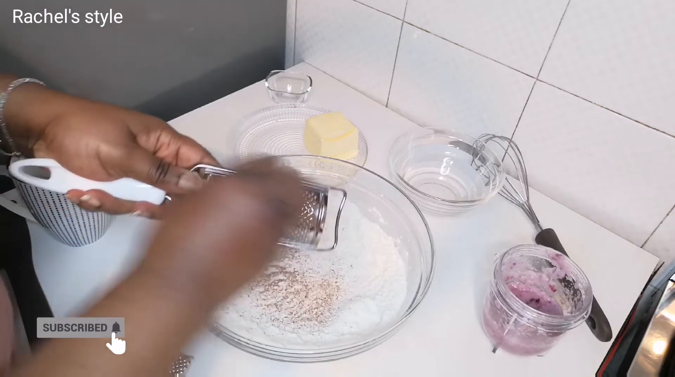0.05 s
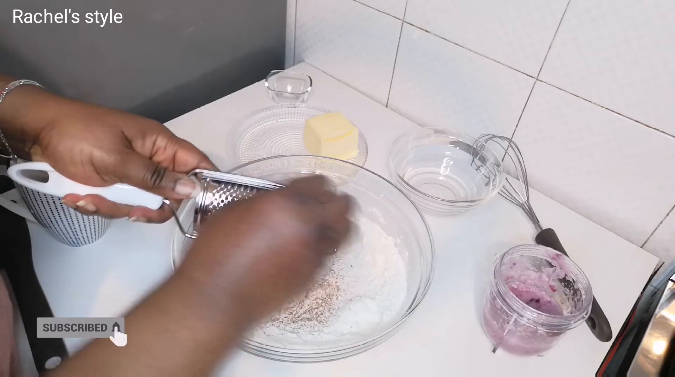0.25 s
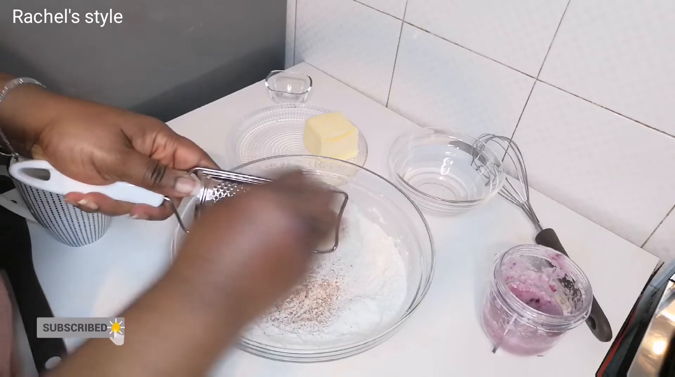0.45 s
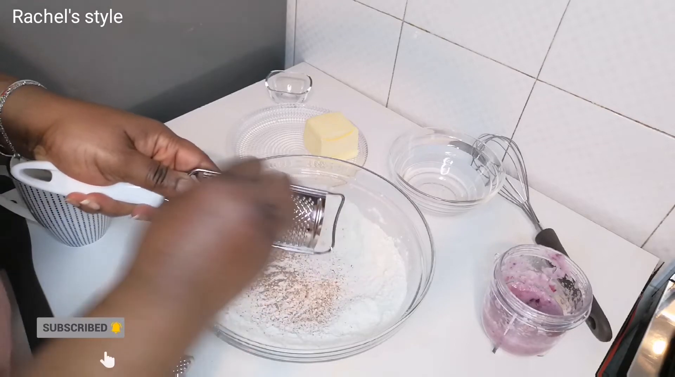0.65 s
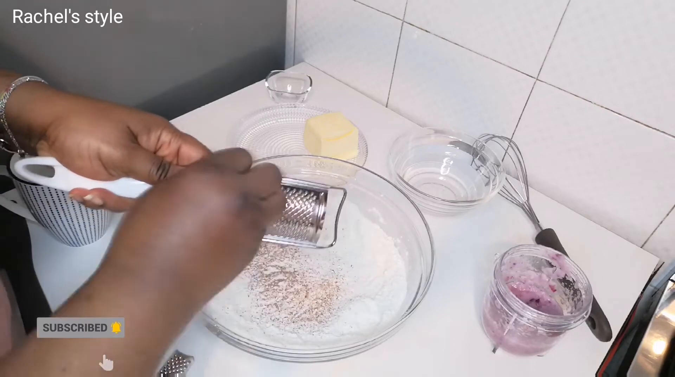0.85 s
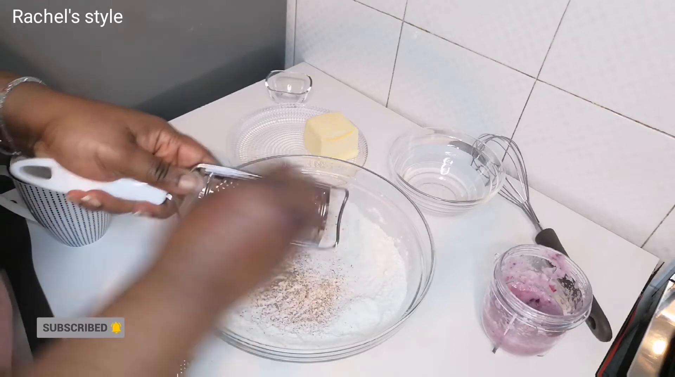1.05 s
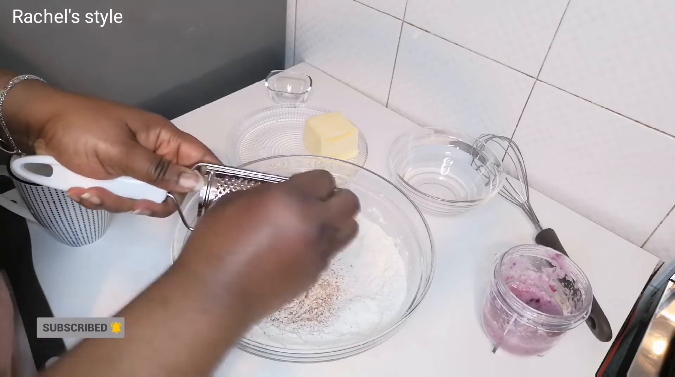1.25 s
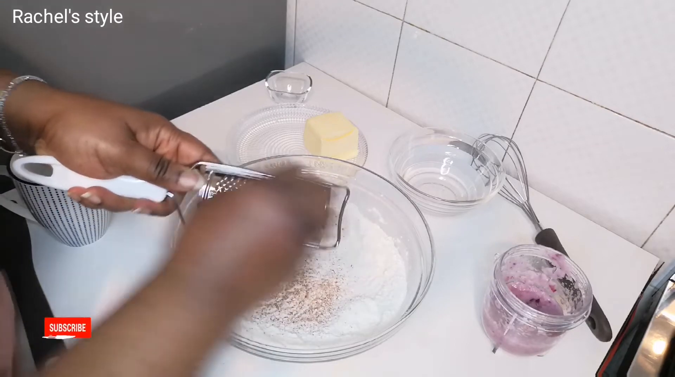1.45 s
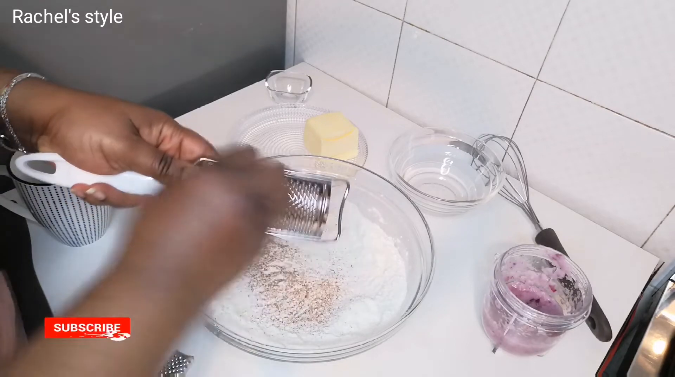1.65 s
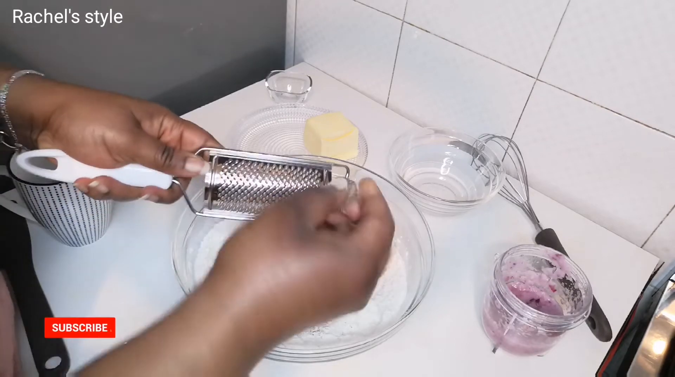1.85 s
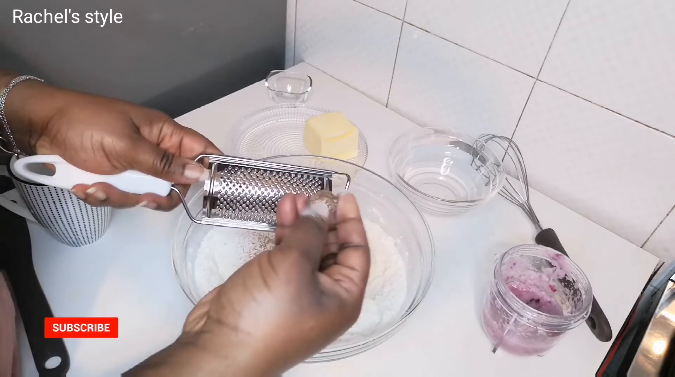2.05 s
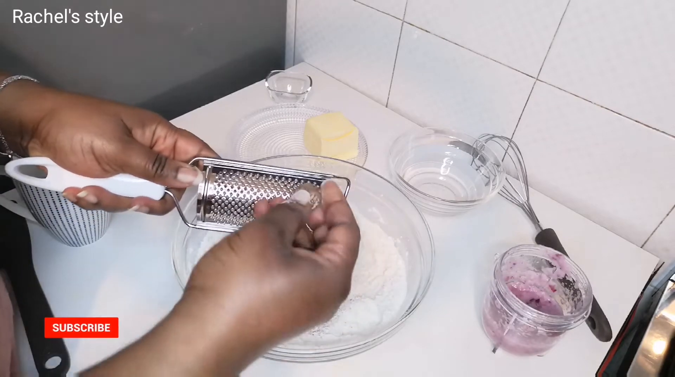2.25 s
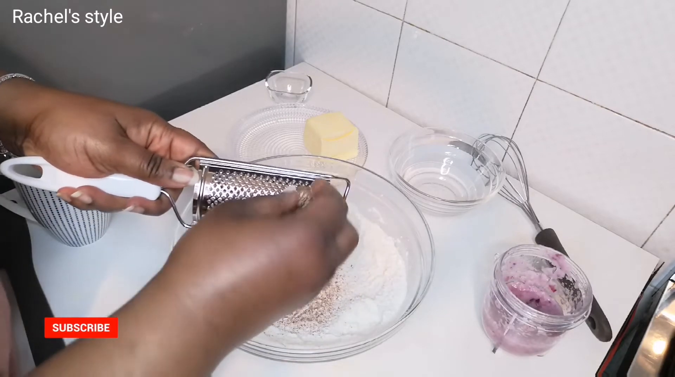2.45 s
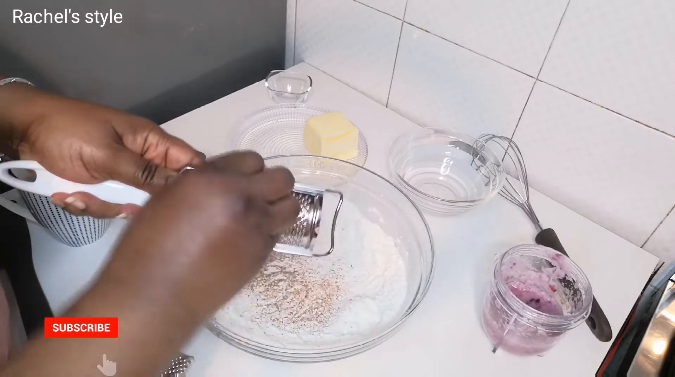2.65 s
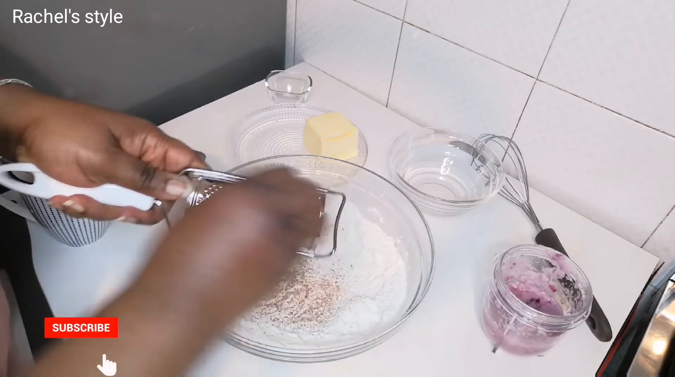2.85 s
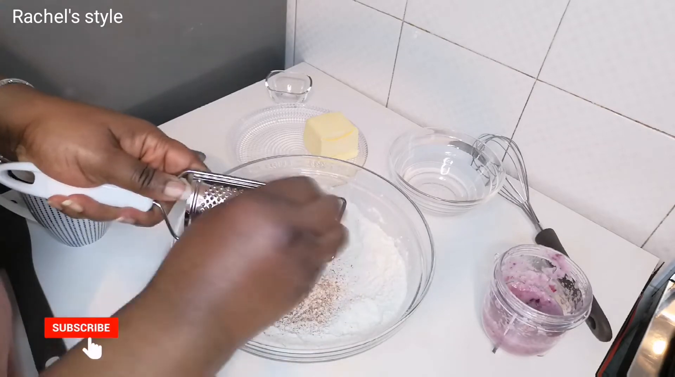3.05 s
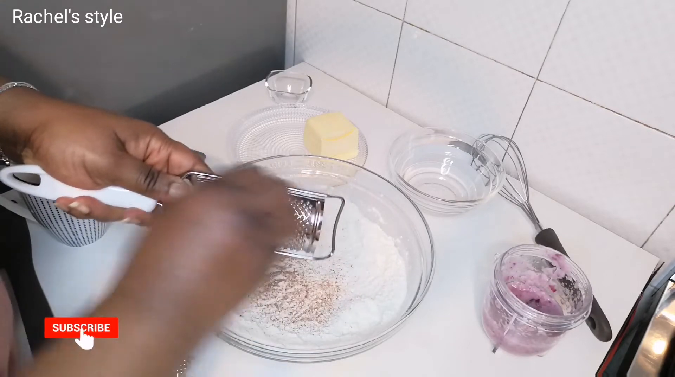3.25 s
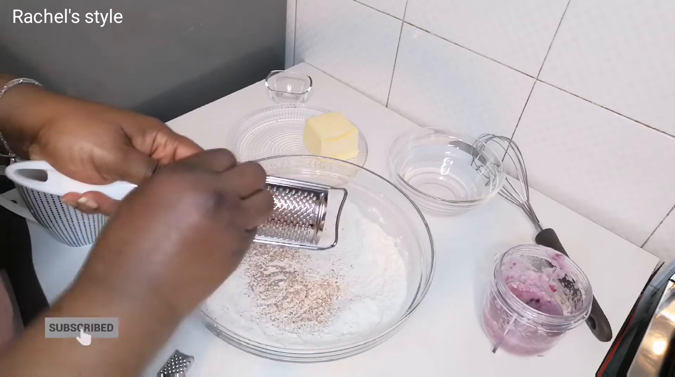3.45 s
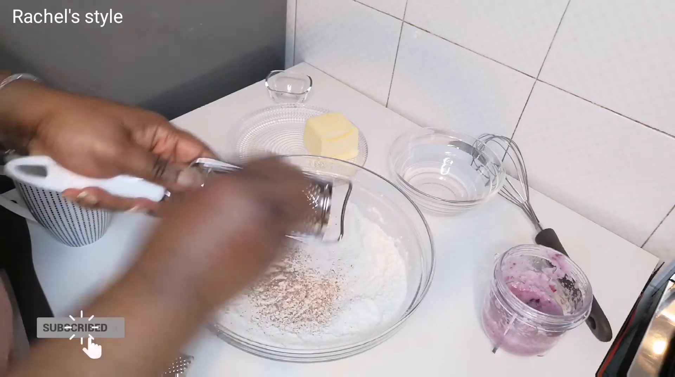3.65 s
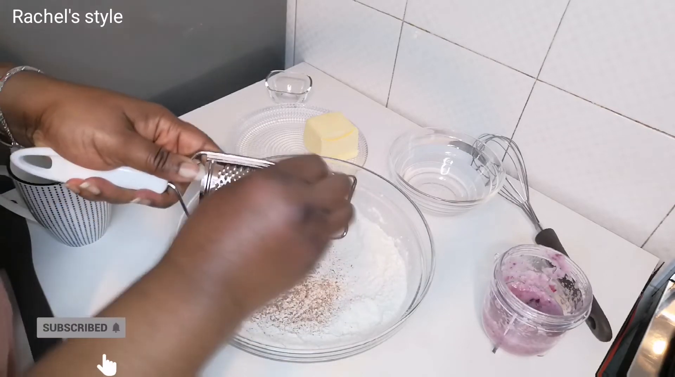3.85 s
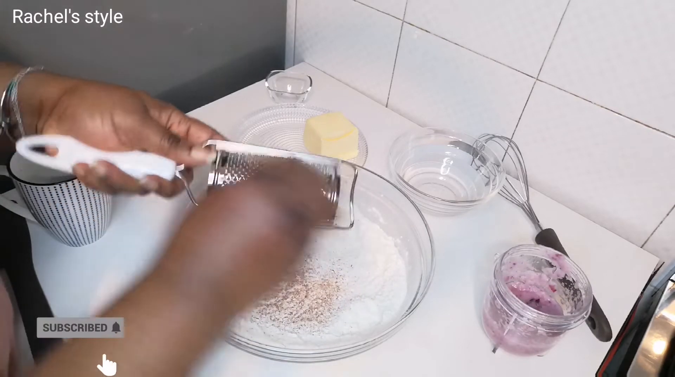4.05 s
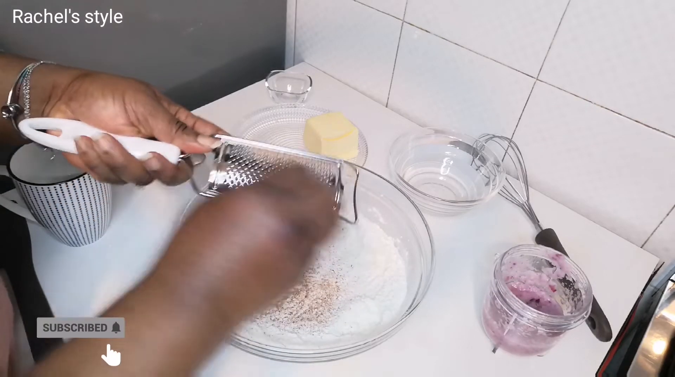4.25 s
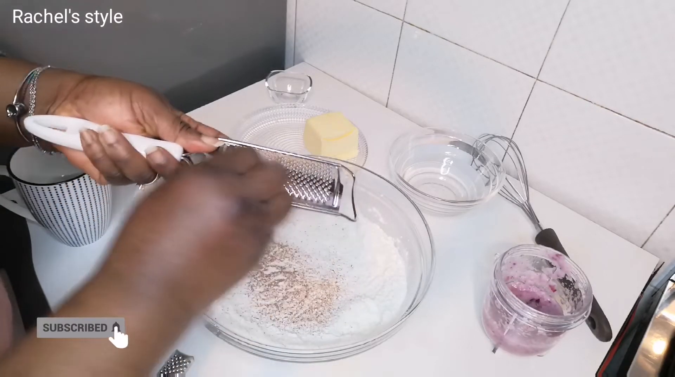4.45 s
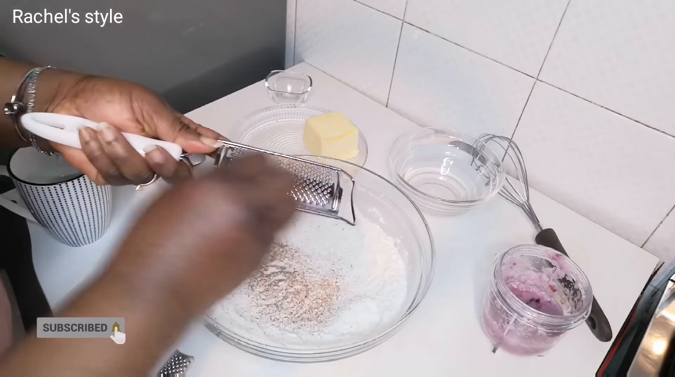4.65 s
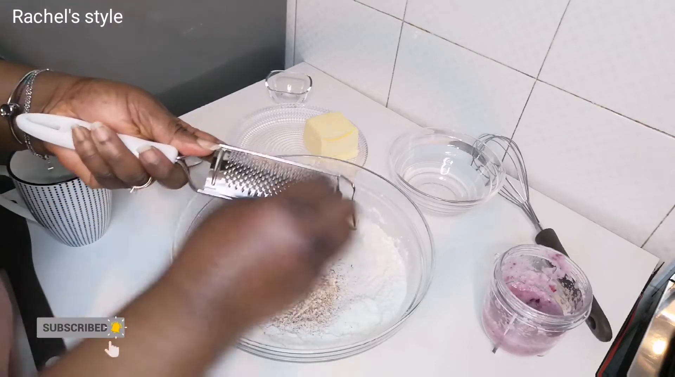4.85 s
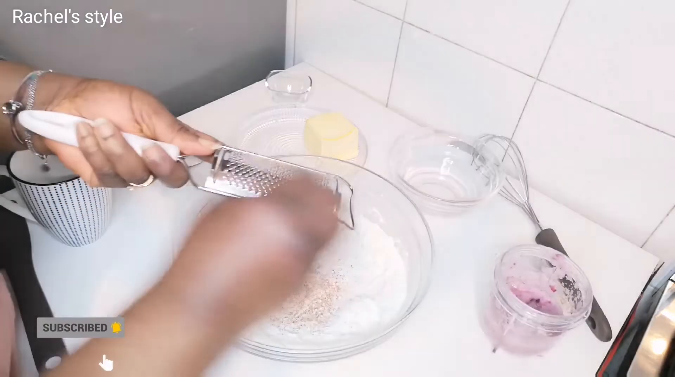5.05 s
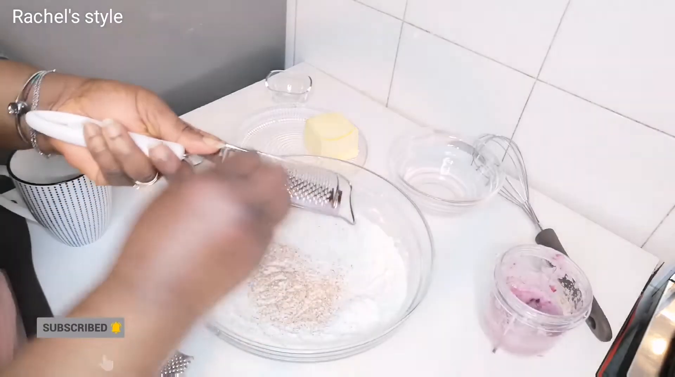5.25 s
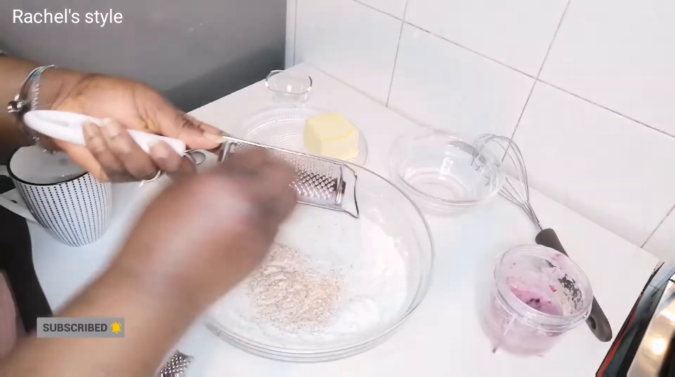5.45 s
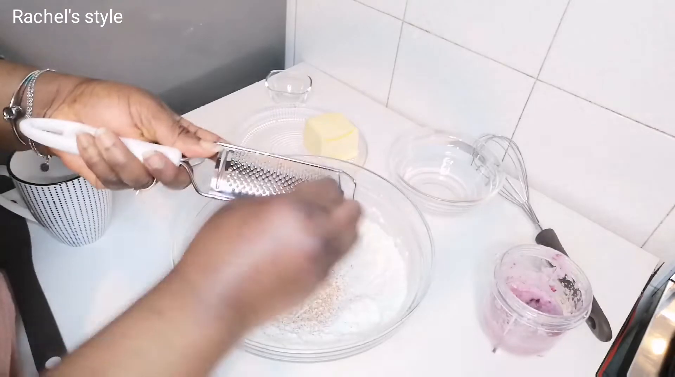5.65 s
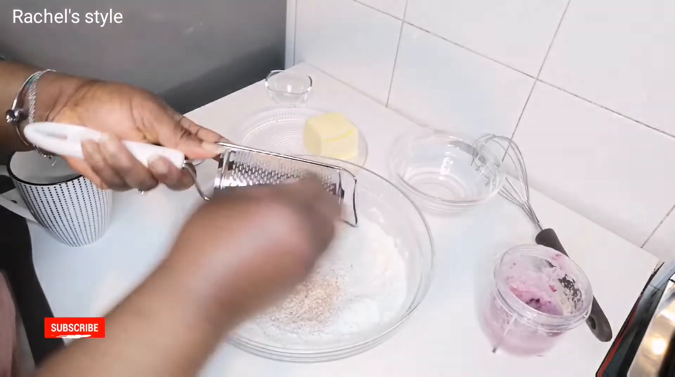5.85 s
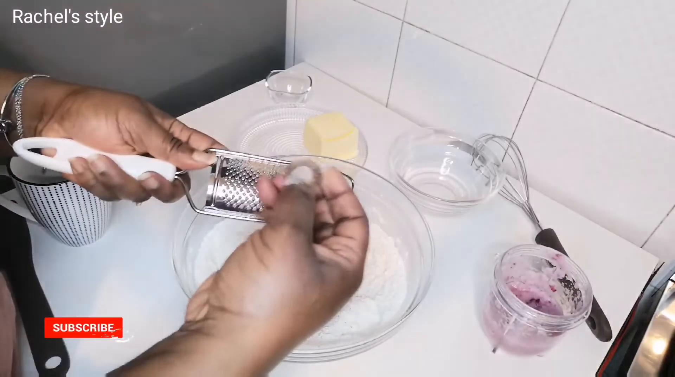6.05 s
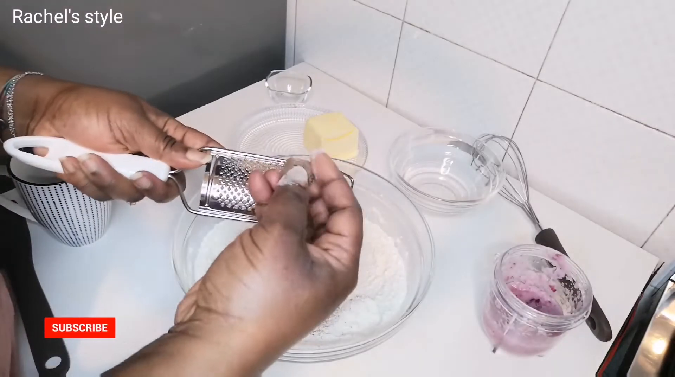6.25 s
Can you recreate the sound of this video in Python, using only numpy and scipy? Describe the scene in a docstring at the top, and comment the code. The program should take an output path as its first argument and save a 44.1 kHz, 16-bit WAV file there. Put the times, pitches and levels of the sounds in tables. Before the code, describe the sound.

Close up in a home kitchen with a slight echo, a hard spice scrapes quickly and evenly across a small metal grater. The strokes are bright and gritty, now and then snagging on a tooth or knocking softly. They break off for under a second, then carry on in a longer run whose metallic tone shifts partway through. A steady low appliance hum lies underneath and remains when the strokes stop.

```python
"""Over the hum of a kitchen appliance, a nutmeg is rubbed to and fro on a small hand-held steel grater,
eight strokes a second. The teeth chip the nut in dense tiny snaps that ring the sheet, with the odd
hard catch and dull thud. Near 1.9 s the cook pauses, and a slow gain control brings the hum forward.
Near 2.7 s the grating resumes in a new grip; at 4.1 s the grater tilts and its ring changes colour.
The strokes stop near 6 s and leave the hum."""
import sys
import numpy as np
from scipy import signal
from scipy.fft import rfft, irfft, next_fast_len
from scipy.io import wavfile
from scipy.ndimage import uniform_filter1d, map_coordinates

SR = 44100
rng = np.random.default_rng(int(sys.argv[2]) if len(sys.argv) > 2 else 0)


def wav_record(signal):
    """Record a signal, one row per channel, as 16-bit PCM in the file named by sys.argv[1]."""
    frames = np.transpose(np.atleast_2d(signal))
    bounded = np.clip(frames, -1, 1)
    # unit amplitude maps onto the largest positive 16-bit level
    quanta = np.round(bounded * 32767).astype(np.int16)
    wavfile.write(sys.argv[1], SR, quanta)


N = 277830

# the nut is driven along the teeth, and drawn back: (first bite [s], length [s], level [dB])
PUSHES = [(-0.03, 0.068, -29), (0.21, 0.072, -27), (0.459, 0.073, -28.5), (0.711, 0.061, -28.5),
          (0.956, 0.069, -28.5), (1.203, 0.061, -28.5), (1.455, 0.074, -32.5), (1.704, 0.063, -29.5),
          (2.771, 0.075, -35.5), (3.01, 0.069, -30.5), (3.263, 0.078, -32), (3.518, 0.075, -32.7),
          (3.779, 0.07, -32.5), (4.026, 0.079, -34.5), (4.282, 0.067, -29.5), (4.537, 0.079, -32),
          (4.805, 0.071, -35), (5.057, 0.083, -32.5), (5.334, 0.058, -34), (5.572, 0.071, -32),
          (5.827, 0.07, -33)]
PULLS = [(0.083, 0.085, -31), (0.337, 0.069, -28), (0.583, 0.083, -32), (0.833, 0.077, -32),
         (1.072, 0.088, -31.5), (1.322, 0.081, -32), (1.579, 0.085, -34), (1.822, 0.064, -33),
         (2.888, 0.078, -35), (3.144, 0.082, -35.4), (3.395, 0.082, -36), (3.66, 0.077, -34.5),
         (3.898, 0.085, -36), (4.161, 0.086, -40), (4.408, 0.084, -33.5), (4.676, 0.084, -36.5),
         (4.928, 0.095, -35.5), (5.195, 0.095, -37.5), (5.458, 0.076, -36), (5.695, 0.086, -35)]
# the hand moves to the second grip, then to the tilted one: (time [s])
GRIP_CHANGES = [2.3, 4.14]


def amp(db):
    """Decibels to gain."""
    return 10 ** (np.asarray(db) / 20)


def unit(x):
    """Scale to rms 1."""
    return x / np.sqrt(np.mean(x ** 2) + 1e-20)


def along(points, hz):
    """Read a curve of (frequency [Hz], value) points on a log axis."""
    freqs, values = np.transpose(points)
    return np.interp(np.log(hz + 1), np.log(freqs), values)


def wobble(rate):
    """A smooth random curve, rate knots a second."""
    knots = rng.standard_normal(int(N * rate / SR) + 4)
    return map_coordinates(knots, [np.arange(N) * rate / SR])


def filtered(x, response):
    """Equalise x with a gain given as a function of frequency."""
    size = next_fast_len(N + SR // 2)
    return irfft(rfft(x, size) * response(np.fft.rfftfreq(size, 1 / SR)), size)[:N]


def appliance(mains_hz=100.04, mains_db=-41, air_db=-54, waver_db=0.67):
    """The bed: a steady mains hum with faint motor tones over a soft rush of air."""
    # motor tones: (frequency [Hz], level [dB])
    motor_tones = [(49.5, -83), (200.08, -69.5), (299, -64.5), (314, -66), (393, -74), (495, -71),
                   (590, -75), (680, -79), (834, -78), (1925, -81), (1990, -82)]
    # spectrum of the air noise: (frequency [Hz], relative level [dB])
    air_spectrum = [(25, -3.5), (55, 0.5), (140, 1.5), (180, -6.5), (285, -1.5), (470, -6), (700, -16),
                    (1400, -24), (3300, -29), (4000, -39.5), (6800, -29), (8800, -42.5), (13500, -39.5),
                    (14900, -31.5)]
    t = np.arange(N) / SR
    tone = lambda hz, db: amp(db) * np.sqrt(2) * np.sin(2 * np.pi * (hz * t + rng.random()))
    mains = tone(mains_hz, mains_db) * amp(waver_db * wobble(6.9))
    motor = sum(tone(hz, db) * amp(3.34 * wobble(16)) for hz, db in motor_tones)
    air = unit(filtered(rng.standard_normal(N), lambda hz: amp(along(air_spectrum, hz))))
    return mains + motor + amp(air_db) * air


def kitchen(x, predelay_s=.003, blocks=20):
    """The tiled room's tail, drawn afresh for each block as the moving hands change the paths."""
    # reverb decay: (frequency [Hz], t60 [s])
    decay_times = [(200, 0.12), (1300, 0.51), (3500, 0.46), (9000, 0.41), (15000, 0.3)]
    wet = np.zeros(N + SR)
    for block in np.array_split(np.arange(N), blocks):
        hz, t, noise = signal.stft(rng.standard_normal(SR // 2), SR, nperseg=256)
        decay = amp(-60 * t / along(decay_times, hz)[:, None])
        tail = signal.istft(noise * decay, SR, nperseg=256)[1]
        echo = signal.fftconvolve(x[block], tail / np.linalg.norm(tail))
        wet[block[0] + round(predelay_s * SR):][:len(echo)] += echo
    return wet[:N]


def thuds(t60=0.2, attack_s=0.0016):
    """Now and then the grater gives in the hand and thuds dully, softly started and soon damped."""
    # (time [s], level [dB], pitch [Hz])
    dull_thuds = [(0.341, -40.5, 351), (1.332, -41, 402), (1.385, -40.5, 339), (2.772, -38.5, 333),
                  (2.926, -40, 347), (4.05, -42.5, 352)]
    out, t = np.zeros(N + SR), np.arange(SR // 3) / SR
    for s, db, hz in dull_thuds:
        phase = 2 * np.pi * hz * t + .8 * wobble(140)[:len(t)]
        envelope = amp(db - 60 * t / t60) * (1 - np.exp(-t / attack_s))
        out[round(s * SR):][:len(t)] += envelope * np.sin(phase)
    return out[:N]


def snaps(rate, scatter_db):
    """Chips break off as random clicks of uneven size, rate a second, of mean power 1."""
    chance = np.clip(rate / SR, 1e-4, 1)
    sizes = unit(amp(scatter_db * np.clip(rng.standard_normal(N), -2, 2)))
    signs = rng.choice([-1, 1], N)
    return (rng.random(N) < chance) * sizes * signs / np.sqrt(chance)


def bands(hz, body_hz=2200, zip_hz=5550, zip_width_hz=750, fizz_hz=9500):
    """Weights 0-1 of a scrape's low body, narrow middle zip and top fizz."""
    body = 1 / (1 + (hz / body_hz) ** 4)
    zip_band = np.exp(-((hz - zip_hz) / zip_width_hz) ** 2)
    fizz = 1 - 1 / (1 + (hz / fizz_hz) ** 8)
    return body, zip_band, fizz


def toned(force, band_db, patchy_db, size=256):
    """Colour the force by band; the travelling contact point drives shifting patches of the spectrum."""
    framing = dict(nperseg=size, noverlap=size * 3 // 4)
    hz, s, spectrum = signal.stft(force, SR, **framing)
    frames = np.minimum(np.round(s * SR).astype(int), N - 1)
    colour = sum(np.outer(weight, db[frames]) for weight, db in zip(bands(hz), band_db))
    patches = uniform_filter1d(rng.standard_normal(spectrum.shape), size=3, axis=0)
    patches = uniform_filter1d(patches, size=14, axis=1)
    return signal.istft(spectrum * amp(colour + patchy_db * unit(patches)), SR, **framing)[1][:N]


def catches(t60=0.056, bite_db=1, bite_scatter_db=0.5, bite_knock_db=-5.0):
    """A tooth digs in with a burst of snaps: lightly as each stroke begins, now and then hard."""
    # the nut lands or snags on a tooth: (time [s], level [dB], knock in the body band [dB])
    snags = [(0.338, -27, 12), (1.072, -24.5, 2), (1.323, -26, 12.5), (2.727, -37, -35),
             (2.837, -27.5, -10), (4.161, -26.5, 2), (4.181, -28, 6.5), (4.223, -24.5, -2),
             (5.956, -32.5, 0)]
    t = np.arange(N) / SR
    level, knock = np.zeros(N), np.full(N, bite_knock_db)
    burst = lambda s, db: amp(db - 60 * np.abs(t - s) / t60) * (t >= s)
    for s, _, db in [*PUSHES, *PULLS]:
        level += burst(s, db + bite_db + bite_scatter_db * rng.standard_normal())
    for s, db, knock_db in snags:
        level = np.maximum(level, burst(s, db))
        knock[(t > s - .01) & (t < s + t60)] = knock_db
    return toned(level * snaps(rate=8000, scatter_db=1.5), [knock], patchy_db=3)


def strokes():
    """Every stroke with the swing of its direction and the tone of its grip."""
    # the hand's swing: (run-up before the bite [s], fastest point [share of length], run-out [s])
    push_swing = (0.017, .54, .016)
    pull_swing = (.02, .5, 0.016)
    # stroke tone in the first, second and tilted grip: (body [dB], fizz [dB])
    push_tones = [(-2.5, -0.1), (0.6, -1), (0, 0.2)]
    pull_tones = [(3, 1.3), (1.2, 1), (-1.3, 0.04)]
    for rows, swing, tones in (PUSHES, push_swing, push_tones), (PULLS, pull_swing, pull_tones):
        for s, length, db in rows:
            yield s, length, db, swing, tones[np.searchsorted(GRIP_CHANGES, s)]


def rasp(snap_rate=10500, tooth_rate=330, chatter_db=-0.5, lurch_db=0.1, swell=1.115,
         tone_scatter_db=0.98):
    """In each stroke the nut speeds up and stops; faster means louder, denser and brighter."""
    # level ride on the zip band: (time [s], level [dB])
    zip_ride = [(0, -1.0), (.5, 2), (1.2, -0.5), (1.8, -3.5), (3.2, 2), (4.05, 2.5), (4.3, -10), (4.6, 2),
                (5.3, -1.5), (5.7, 4.5), (5.95, 0.5)]
    # tone at full speed, and its shift as the nut slows: (body [dB], zip [dB], fizz [dB])
    fast_tone, slow_shift = [-2, -2, 1], [6, 5, -3]
    t = np.arange(N) / SR
    speed, level = np.zeros((2, N))
    colour = np.zeros((3, N))
    for s, length, db, (run_up, fastest, run_out), (body, fizz) in strokes():
        start, end = s - run_up, s + length + run_out
        progress = np.interp(t, [start, s + fastest * length, end], [0, .5, 1])
        arch = np.abs(np.sin(np.pi * progress))
        inside = (t > start) & (t < end)
        speed += arch
        level += amp(db) * arch ** swell * inside
        colour[:, inside] = np.c_[[body, 0, fizz]] + tone_scatter_db * rng.standard_normal((3, 1))
    colour[1] += np.interp(t, *np.transpose(zip_ride))
    colour += np.c_[fast_tone] + np.outer(slow_shift, 1 - speed)
    # rows of teeth bite in clumps, and the hand's pressure is uneven
    roughness = unit(amp(chatter_db * wobble(tooth_rate) + lurch_db * wobble(70)))
    chips = snaps(snap_rate * (speed + .15), scatter_db=2)
    return toned(level * roughness * chips, colour, patchy_db=3.5)


def sheet_ring(grip, size=4096):
    """The steel sheet's ring after one snap, of energy 1; each grip damps the modes differently."""
    # (frequency [Hz], width [Hz], first grip [dB], second grip [dB], tilted grip [dB])
    sheet_modes = [(316, 47, -12.5, -9, -11.5), (645, 136, -10.5, -11, -15), (1101, 85, -10, -9.5, -10.5),
                   (1290, 103, -8, -10.5, -37), (1668, 48, -12, -7, -11.5), (1990, 300, -12.5, -10.5, -20),
                   (2640, 159, -1.5, -1.5, -4), (2923, 82, -3.5, -7, -16), (3330, 166, -8.5, -8.5, -12.5),
                   (3598, 83, -4.5, -8, -14.5), (4240, 280, -14, -12, -16.5), (5423.0, 570, -6.5, -9.5, -6),
                   (6240, 270, -3, -6.5, -5.5), (7206, 310, 2, -0.8, -2), (7750, 190, -2, -3.5, -7.5),
                   (8110, 158, 0.3, -0.6, -3.5), (8550, 132.0, -8, -10, -14.5),
                   (10200, 370, -10, -11, -12.5), (12450, 122.0, -8, -11, -8.5), (13260, 170, -7, -6.5, -8),
                   (14000, 324.0, -17, -15.5, -12), (14740, 187, -1, -15, -22),
                   (14901.0, 170, -10, -1.5, -2)]
    # broad spectrum of a snap between the modes: (frequency [Hz], level [dB])
    snap_spectrum = [(60, -48), (170, -23.5), (400, -27), (900, -26.5), (1500, -48), (2100, -34),
                     (4500, -17), (7000, -20.5), (9300, -27), (11700, -22.5), (15700, -22)]
    hz = np.fft.rfftfreq(size, 1 / SR) + 1
    power = amp(along(snap_spectrum, hz)) ** 2
    for centre, width, *levels in sheet_modes:
        power += amp(levels[grip]) ** 2 / (1 + ((hz ** 2 - centre ** 2) / (hz * width)) ** 2)
    # minimum phase: the attack comes first and the ring follows
    cepstrum = irfft(np.log(power) / 2)
    lag = np.arange(size)
    causal_fold = (1 + np.sign(size // 2 - lag)) * (lag > 0)
    ring = irfft(np.exp(rfft(cepstrum * causal_fold)))
    return ring / np.linalg.norm(ring)


def grater(force):
    """The force rings the sheet as it is held at that moment."""
    held = np.searchsorted(GRIP_CHANGES, np.arange(N) / SR)
    return sum(signal.fftconvolve(force * (held == grip), sheet_ring(grip))[:N]
               for grip in range(len(GRIP_CHANGES) + 1))


def scene(rasp_db=-0.31, catch_db=-5, room_db=-8):
    """The mono mix: the grater up close, its room behind it and the appliance underneath."""
    force = amp(rasp_db) * rasp() + amp(catch_db) * catches()
    near = grater(force) + thuds()
    return (near + amp(room_db) * kitchen(near) + appliance())[None]


def record(dry, aim_db=-35.0, slope=0.42, window_s=0.77, top_hz=15780):
    """Slow gain control eases the level towards the aim, lifting the pauses; the very top is cut."""
    weights = np.hanning(int(window_s * SR))
    smooth = lambda x: signal.fftconvolve(x, weights, "same")
    power = np.abs(smooth(dry[0] ** 2) / smooth(np.ones(N)))
    level_db = 10 * np.log10(power + 1e-12)
    gain = amp(slope * (aim_db - level_db))
    return filtered(dry[0] * gain, lambda hz: hz < top_hz)[None]


dry = scene()
out = record(dry)
wav_record(out)
```